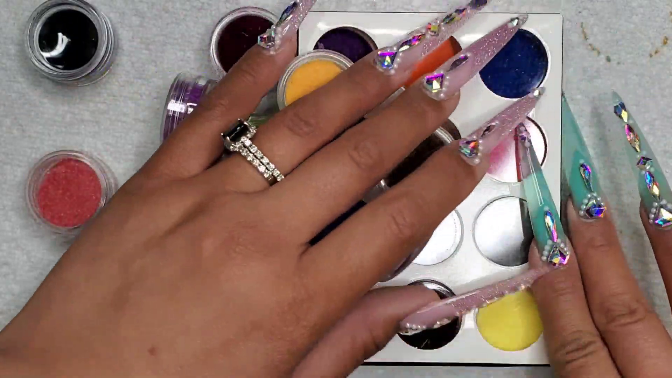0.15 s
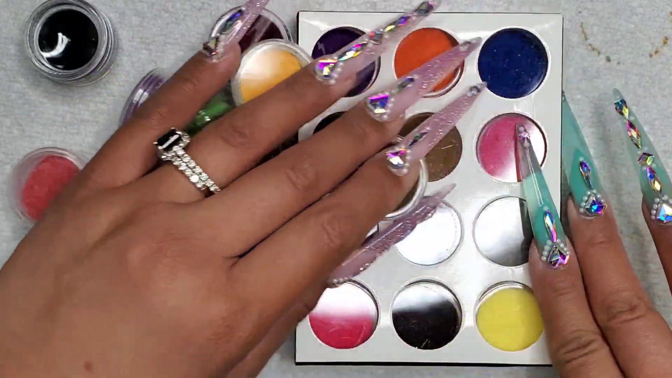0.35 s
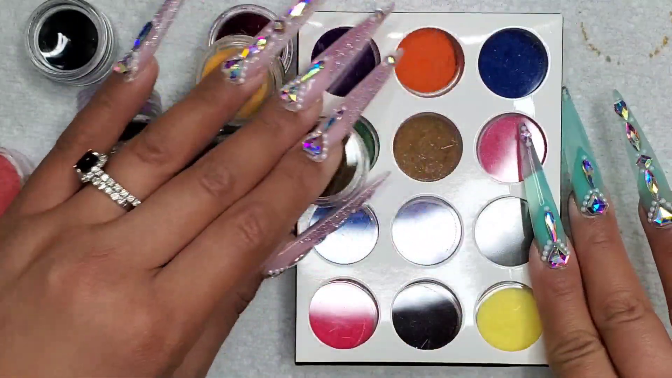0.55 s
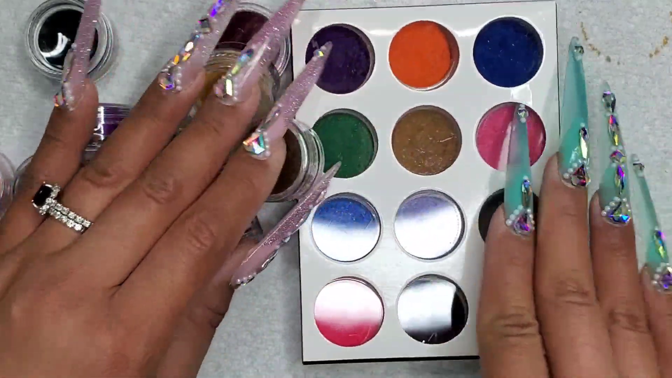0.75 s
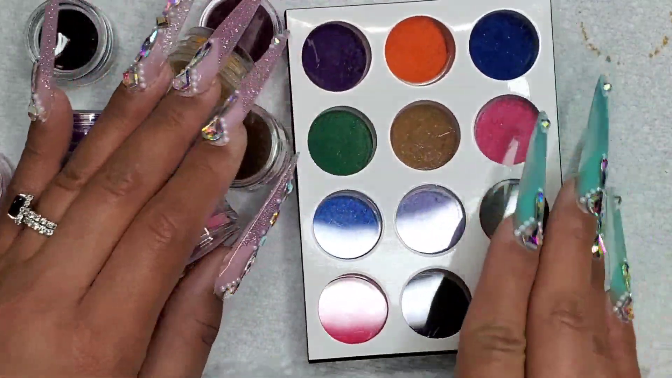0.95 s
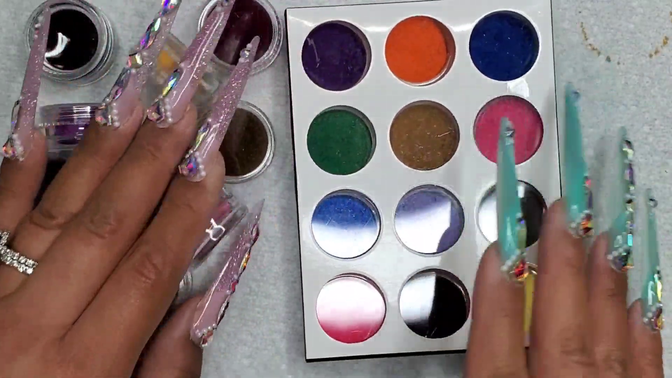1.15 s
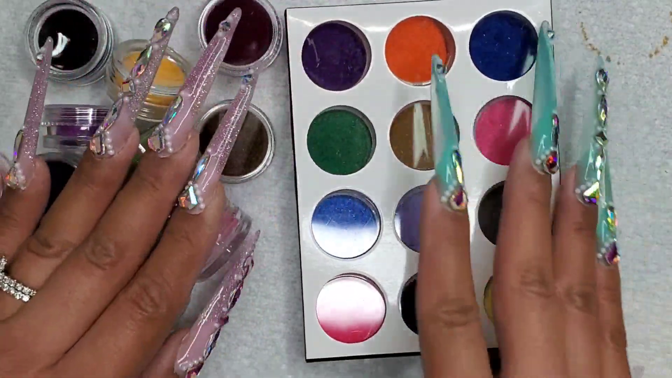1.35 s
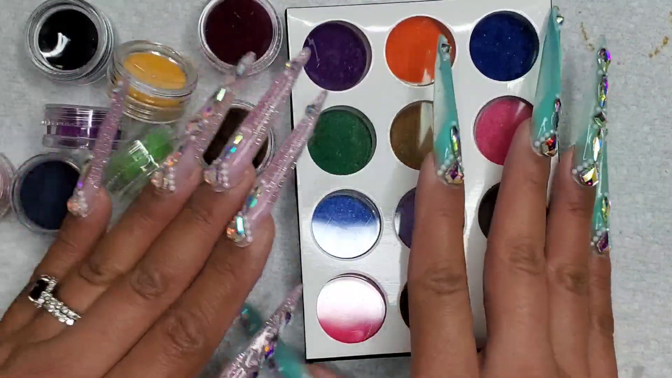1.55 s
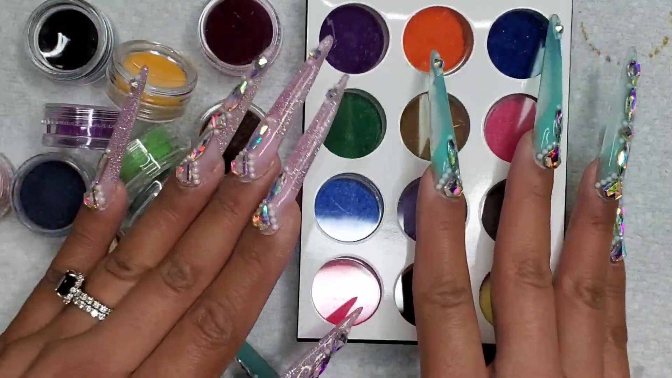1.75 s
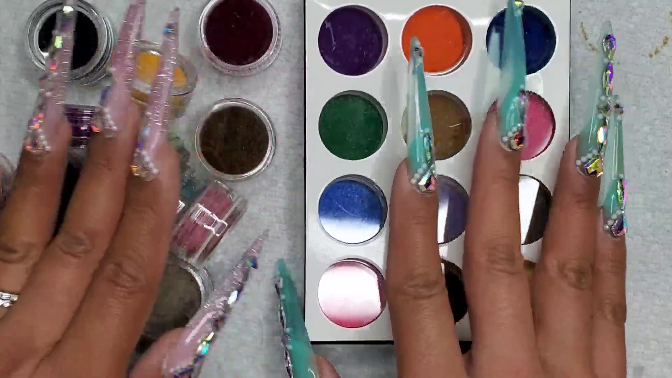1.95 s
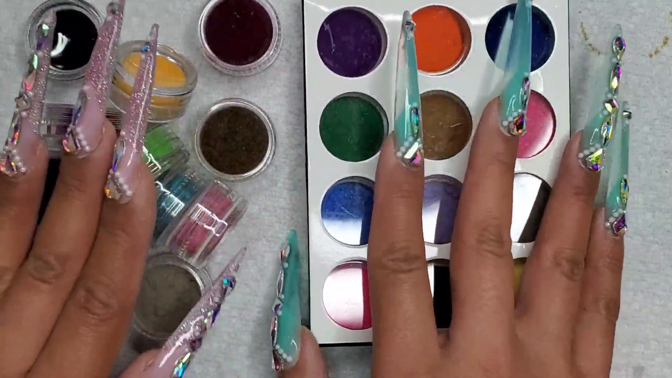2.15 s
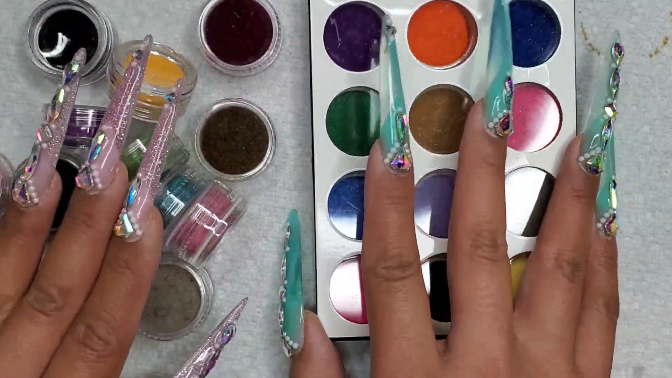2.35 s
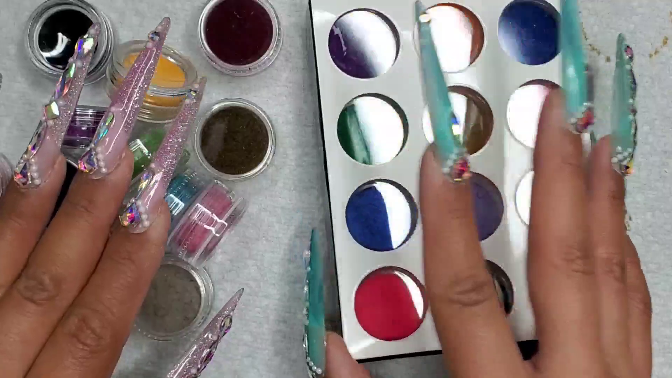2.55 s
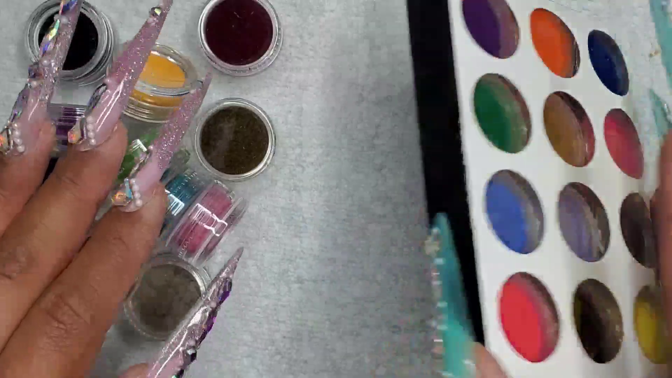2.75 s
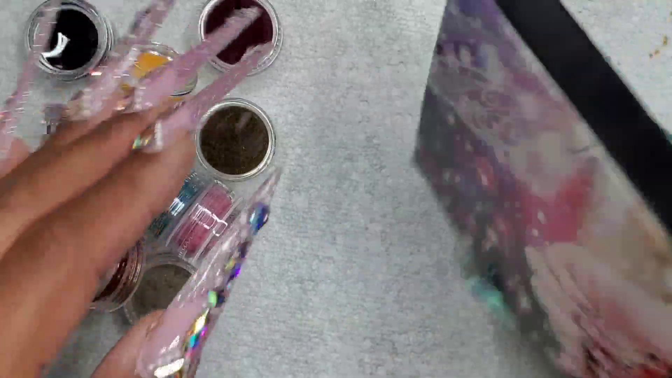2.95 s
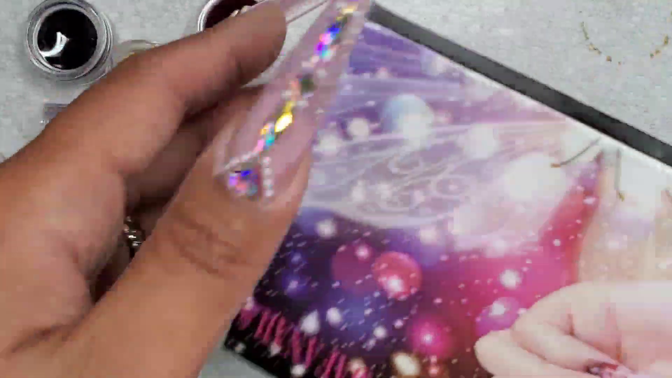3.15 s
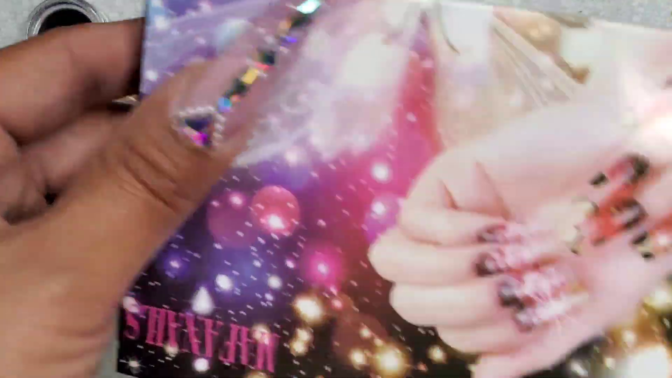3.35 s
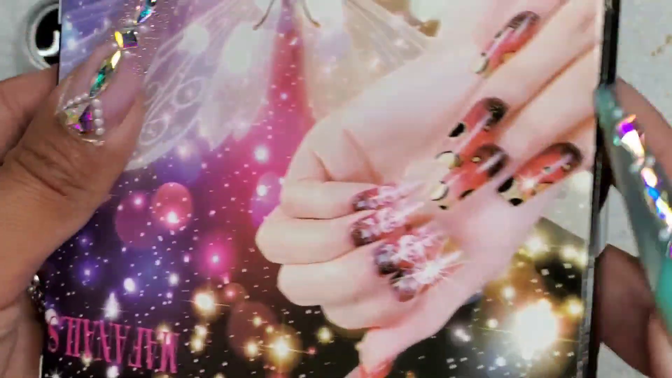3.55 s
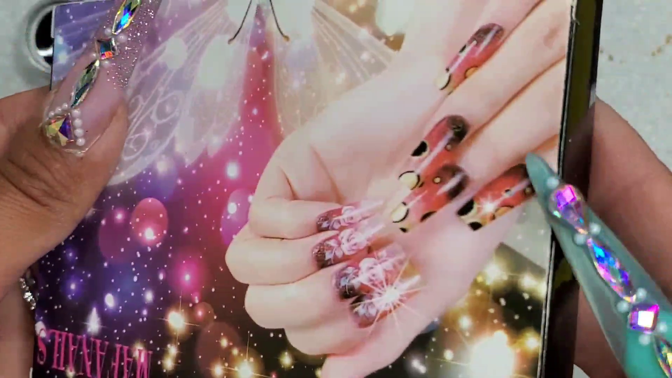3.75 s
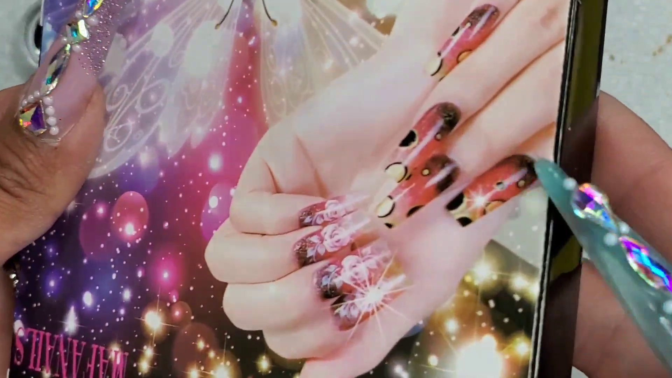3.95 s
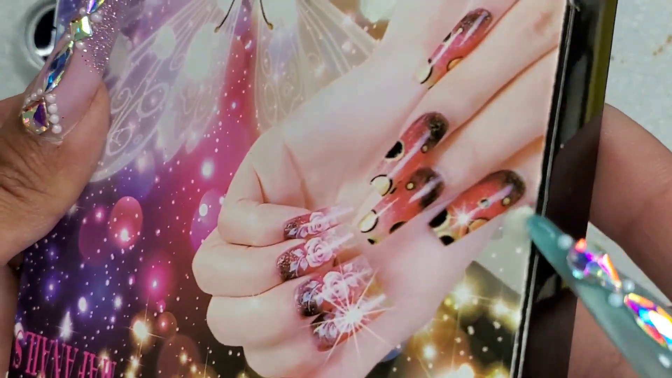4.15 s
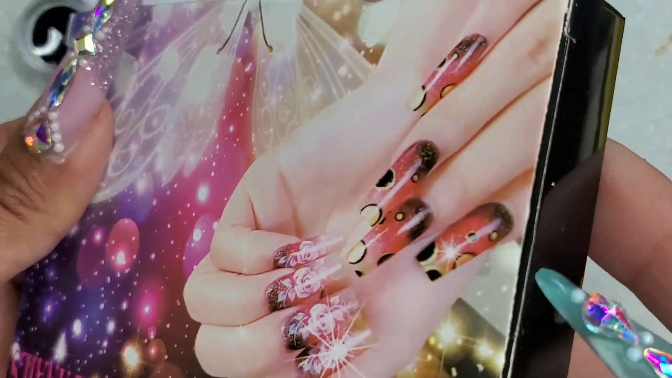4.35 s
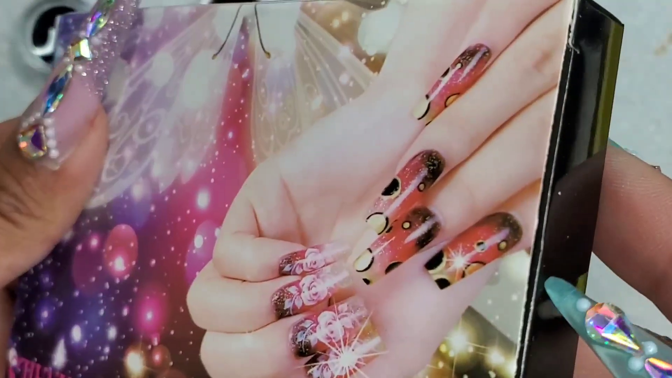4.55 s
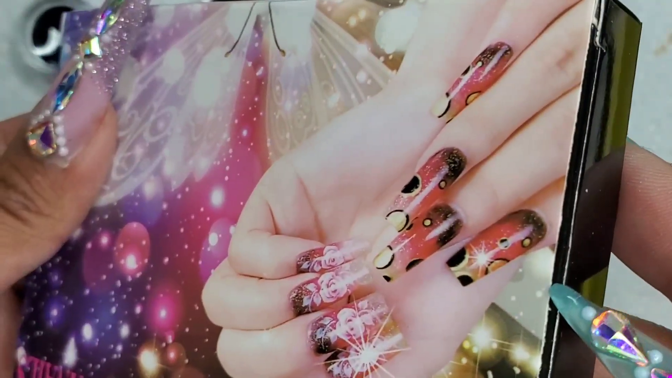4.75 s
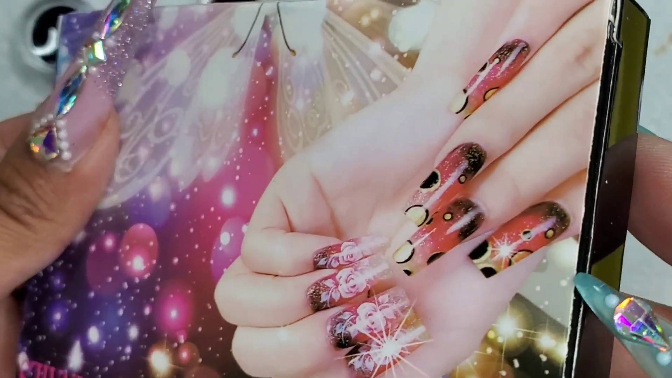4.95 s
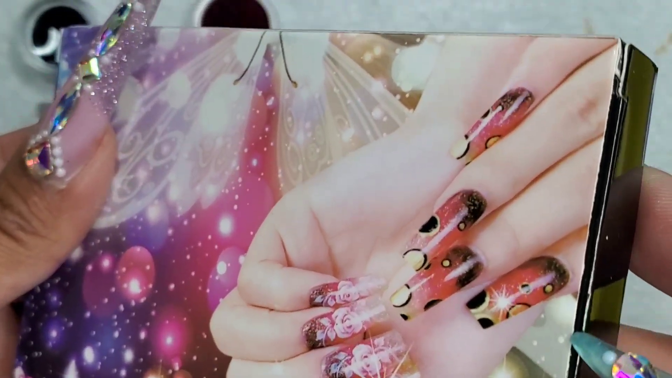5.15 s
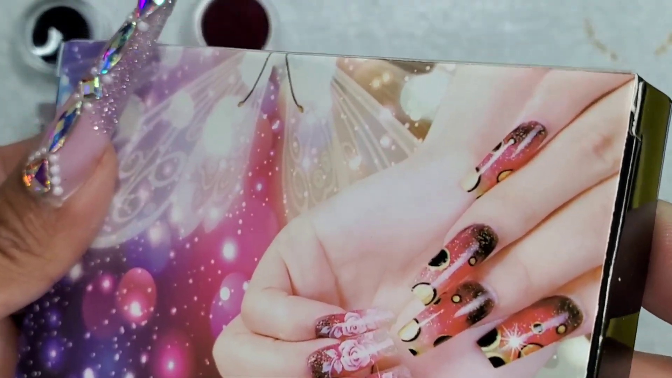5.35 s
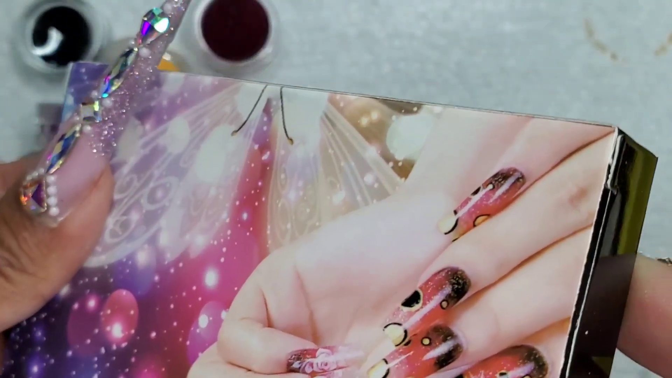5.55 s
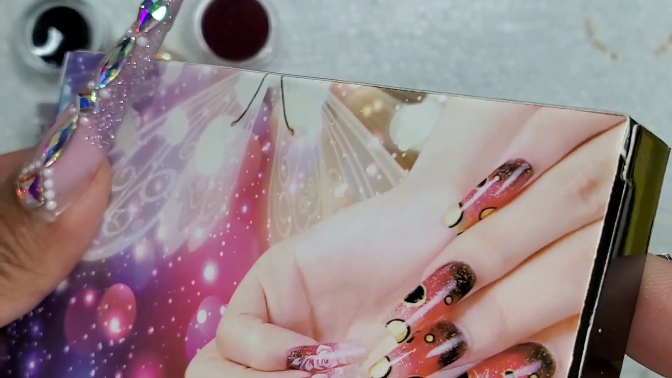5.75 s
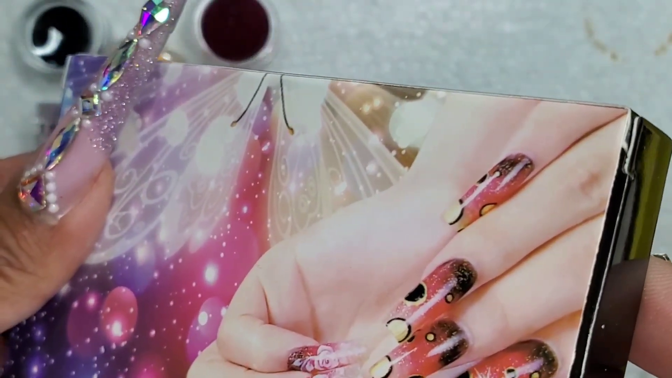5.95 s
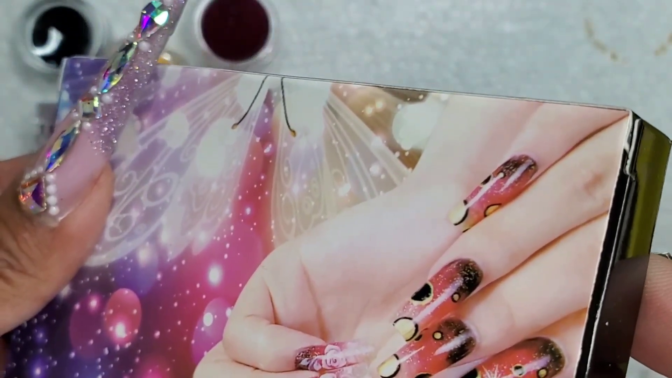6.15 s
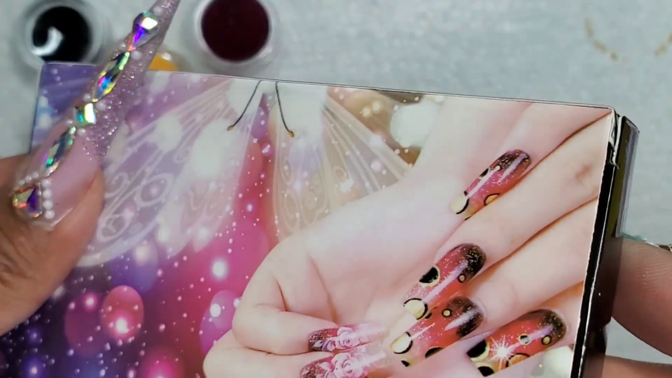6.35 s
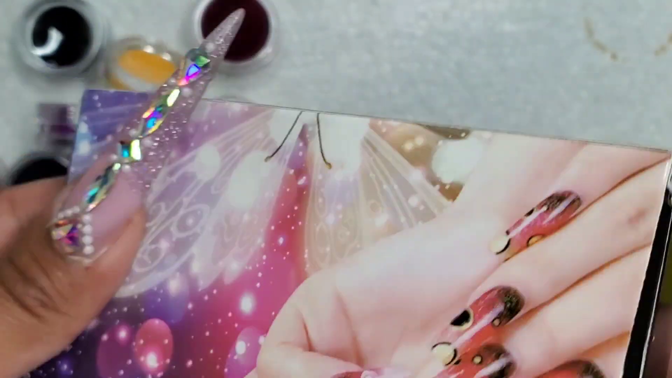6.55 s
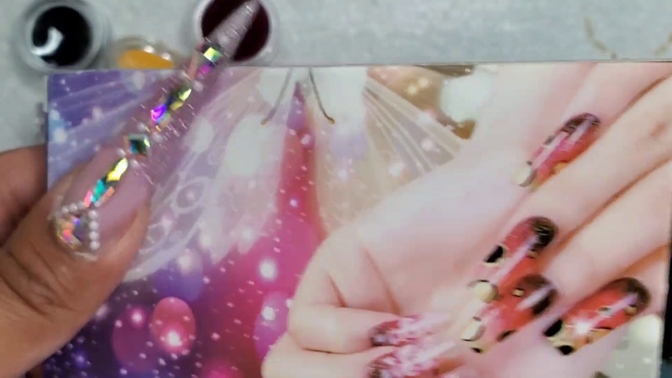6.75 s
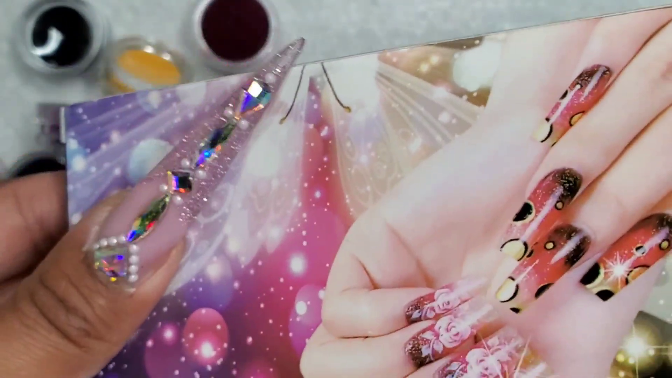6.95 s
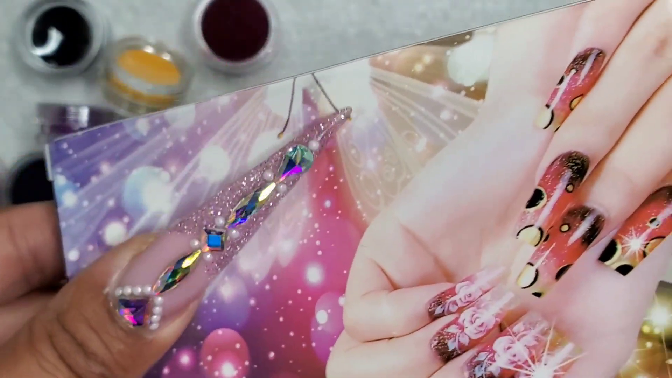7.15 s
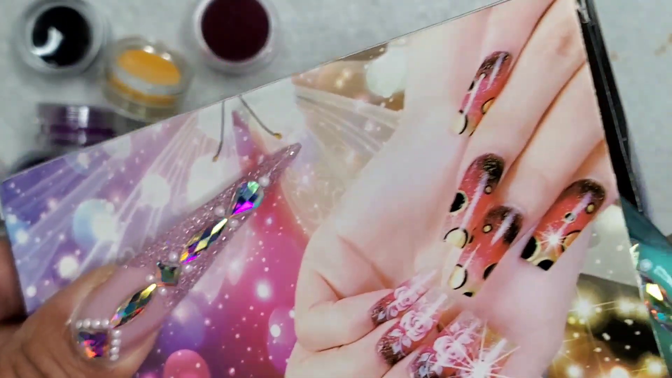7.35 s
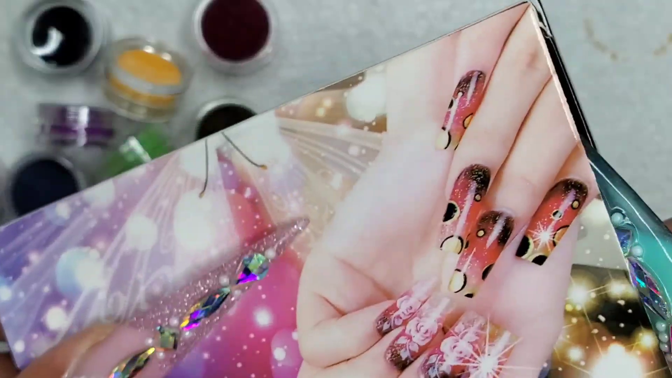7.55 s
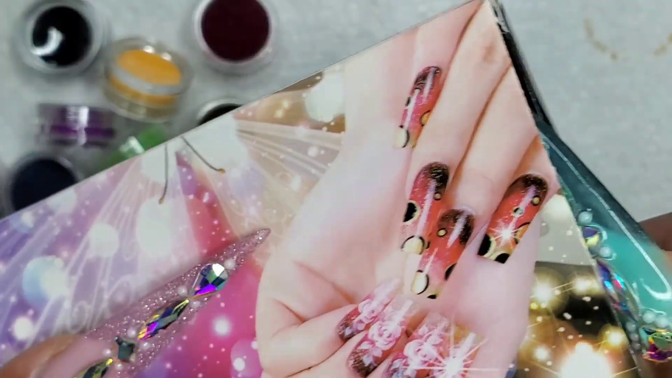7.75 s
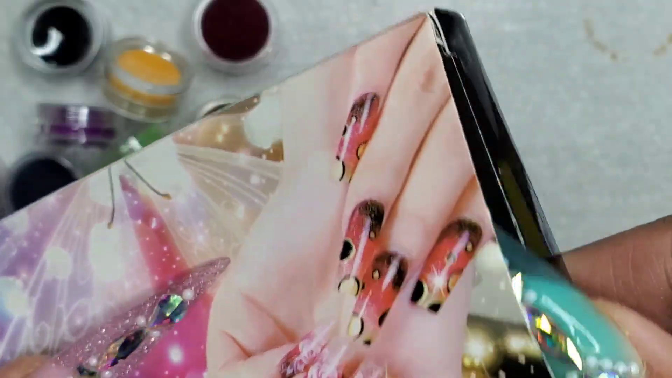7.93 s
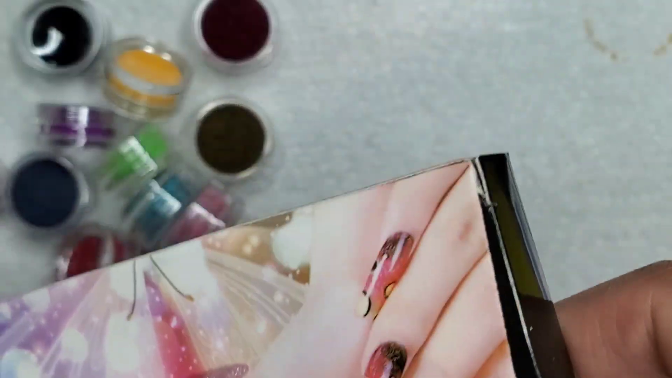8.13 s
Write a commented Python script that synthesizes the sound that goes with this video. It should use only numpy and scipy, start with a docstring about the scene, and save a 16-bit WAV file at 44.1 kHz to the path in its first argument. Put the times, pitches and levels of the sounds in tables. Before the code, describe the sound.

Close, dry stereo sound in a small furnished room with a faint low hum and hiss. From 0 to about 0.7 seconds small hard plastic jars clatter in quick bright clicks, with gritty sliding and tiny squeaks, strongest around 0.25 to 0.5. Stronger knocks with dull table bumps come at 1.07 to 1.17, then only faint clicks until 2. After near quiet, a nail scrapes briefly at 2.6 and 2.8, and a bright jar clatter at 3.0 joins card taps and rubbing. Hollow card taps continue to 3.8; firmer knocks fall at 4.17, 4.67, 5.53 and 6.06, with light picking between. At 6.56 comes by far the loudest knock, a boxy, slightly distorted crack with a flutter of knocks and a short high squeal. Softer rubs follow, a sharper tap at 7.37, then busier nail taps and shuffling from 7.5 to the final double tap near 8.1.

```python
"""Plastic jars and a card palette

Small plastic jars are pushed together on a table and clatter, close to a stereo microphone.
A cardboard palette is then tapped by long fingernails and worked open; its lid gives with a knock and squeal.
Every contact rings a jar or the card, and sliding is a stream of tiny slips that ring them too.
Thumps and squeaks are single swinging tones; behind lie a short room tail and a low hum and hiss of noise."""
import sys
import numpy as np
from scipy import signal
from scipy.fft import rfft, irfft
from scipy.io import wavfile
from scipy.ndimage import uniform_filter1d

SR = 44100
rng = np.random.default_rng(int(sys.argv[2]) if len(sys.argv) > 2 else 0)


def unload_audio(sound):
    """Save the sound as a 16-bit wav file, at the path given as the first command line argument."""
    columns = np.transpose(np.atleast_2d(sound))
    # keep every value between -1 and 1, then stretch to whole-number steps
    steps = np.round(np.clip(columns, -1, 1) * 32767)
    wavfile.write(sys.argv[1], SR, steps.astype(np.int16))


N = 361179  # samples

# Levels in the tables are those before layer gain, room and microphone.
# jars knocking together: (time [s], level at 1-4 kHz [dB], body re level [dB],
# brightness re level [dB], leading resonance [Hz])
JAR_HITS = [(.0283, -29, -15, -6, 1760), (.0478, -27.5, -22, 4.5, 5970), (.069, -30, -13, 1, 4220),
            (.1425, -29, -11, 4, 5530), (.2006, -26.5, -22, -1, 1440), (.2367, -16, -27, 3.5, 5740),
            (.2444, -13.5, -38, 4.5, 5610), (.3126, -18, -28, -4, 1860), (.3502, -10, -23, 6, 6040),
            (.36, -17.5, -10.5, 8, 4030), (.3744, -20.5, -28, 6, 4300), (.402, -21, -18, 8.5, 5700),
            (.4365, -23, -20, 7.5, 4140), (.4615, -20, -22, 5, 4110), (.4994, -22, -30, 2.5, 3200),
            (.5129, -23, -15, -6.5, 3030), (.558, -25.5, -9.5, 8, 5950), (.6096, -28.5, -18, 6, 2800),
            (.6273, -23.5, -27, 0, 4520), (.7366, -47, -16, 3, 5830), (.7646, -24, -28, -1, 2860),
            (.9092, -28.5, -22, 3, 5680), (.9198, -23, -25, -3.5, 4360), (1.0221, -26, -33, -11, 3400),
            (1.0357, -31.5, -26, 4, 2980), (1.0714, -13.5, -16.5, -9, 1920), (1.0849, -21, -8, -2, 1870),
            (1.1147, -13.5, -22, -3.5, 3350), (1.1668, -28, -14, 9.5, 5700), (1.2805, -34, -10, 10, 5620),
            (1.3212, -30, -19, 12.5, 5800), (1.3475, -39.5, -22, 9, 5800), (1.4496, -27.5, -30, 11, 4520),
            (1.6863, -29, -22, 1.5, 1950), (1.716, -51, -9, 19, 10300), (1.7913, -25, -30, 1.5, 5740),
            (1.8446, -32.5, -20, 3.5, 5660), (1.8546, -38.5, -16, 3, 5730), (1.9502, -27.5, -17, -15, 1190),
            (2.9234, -24.5, -11, 4.5, 4800), (3.0087, -17.5, -5.5, 8.5, 5800), (3.0257, -16, -24, -2, 4400),
            (3.0369, -23, -7, 12.5, 5630)]
# pushes that slide the jars on the table: (start [s], length [s], level at 1-4 kHz [dB],
# body re level [dB], treble re level [dB])
JAR_PUSHES = [(0, 0.067, -23, -22, 0), (.07, .62, -39, 1, 4.5), (.17, 0.21, -31, -17, -1),
              (.35, 0.18, -33.5, -6, 4), (.62, 0.05, -35, -19, -13), (.69, 0.22, -36, -12.5, -0.5),
              (.87, 0.072, -35.5, -8.5, -6), (1.012, 0.08, -22.5, -21, -10), (1.11, 0.097, -42, 0.5, 1),
              (1.2, 0.2, -45.5, -5.5, -8), (1.595, 0.044, -36, -14, -3.5), (1.665, 0.02, -33, -25, -1),
              (1.72, 0.13, -47.5, -19, -3), (1.99, .05, -42, -29, 3.5)]
# modes of a jar before detuning and scatter: (frequency [Hz], relative level [dB], t60 [s])
JAR_MODES = [(676, -2, 0.089), (1256, -2.5, 0.042), (1320, -0.5, 0.067), (1773, 0, 0.085), (2950, 7, 0.024),
             (3180, -3, 0.011), (3680, -19.5, 0.0058), (4170, -7, 0.1), (5000, -10, 0.062),
             (5404, -1.5, 0.025), (5926, 2.5, 0.043), (9320, -7.5, 0.022), (10050, -37.5, 0.018),
             (10200, 12.5, 0.026), (13200, -24, 0.0175)]
# colour of a jar's dense, quickly damped ringing: (frequency [Hz], relative level [dB])
JAR_COLOUR = [(150, -13), (400, -4.5), (640, 5.5), (880, -32), (1300, -2.5), (3000, 4), (5900, -13.5),
              (7000, -6), (8500, -13), (10700, -8), (13500, -3), (16000, -18)]
# nails and edges striking the card palette: (time [s], level at 1-4 kHz [dB], body re level [dB],
# brightness re level [dB], leading resonance [Hz])
CARD_HITS = [(2.6207, -35.5, -27, 8, 730), (2.64, -26, -37, -3, 1880), (2.7798, -25, -5, 7.5, 797),
             (2.9572, -23.5, 0, -2.5, 464), (3.1073, -25.5, -2, -1, 676), (3.3315, -16, -3.5, -29, 585),
             (3.3591, -21.5, -20, -8.5, 560), (3.3809, -38, 10, 1, 520), (3.4223, -31, -1.5, -12, 727),
             (3.4909, -28.5, -10, -9.5, 550), (3.5426, -33.5, -8.5, -23, 434), (3.6077, -25, -18, -7, 530),
             (3.6211, -22.5, -5, -10, 1025), (3.7873, -30, -23, -16.5, 1650), (4.1717, -15, -2.5, -7, 1460),
             (4.2735, -34.5, -5.5, -20, 1220), (4.3946, -25, -0.5, -9, 600), (4.67, -18, -9, -13, 1220),
             (4.704, -49, 13.5, -22, 460), (4.82, -52, -21, 2, 5200), (4.8957, -41, -18, -7.5, 950),
             (5.0367, -36.5, -24, -1, 5500), (5.265, -36.5, 1, -27, 1290), (5.4798, -33, -18, -7, 470),
             (5.5271, -15.5, -2.5, -6, 734), (5.5602, -24.5, -3, -2.5, 537), (5.648, -45, 2, -11, 450),
             (5.7098, -38, 4, -12.5, 410), (5.7998, -37, -11, -20, 510), (5.896, -40.5, 0.5, -17, 450),
             (5.9455, -39.5, -3.5, -19, 487), (6.0644, -19, -5, -14, 490), (6.3168, -37, -14, -13, 2180),
             (6.5613, 1, -12.5, -8, 650), (6.5717, -17.5, 1.5, -15, 540), (6.5924, -13.5, 4, -2, 551),
             (6.61, -10.5, 2.5, -3, 594), (6.6265, -18.5, 4.5, -2, 535), (6.6465, -22.5, -2, 2, 505),
             (6.7982, -28.5, 0, -4, 890), (6.8447, -37, 7, -11, 625), (7.0248, -28.5, -8.5, -6.5, 665),
             (7.0717, -35, -2, -9, 680), (7.149, -52, -16, 11.5, 8000), (7.349, -34.5, -10, -8, 620),
             (7.3726, -18, -12.5, -12, 2300), (7.4941, -30, -2, -2.5, 427), (7.5391, -30, -2, -8, 624),
             (7.585, -42.5, 7.5, -11, 540), (7.6862, -19, -1, -5.5, 596), (7.7933, -19, -10.5, 1, 553),
             (7.8249, -31.5, 9, -6, 634), (7.8549, -23.5, -0.5, -23, 780), (7.874, -45.5, 7, 21, 12700),
             (7.9702, -25.5, -4, -5.5, 665), (8.0829, -17, -5, -6, 662), (8.0962, -23, -1.5, -3.5, 657)]
# strokes of card on card and fingers: (start [s], length [s], level at 1-4 kHz [dB],
# body re level [dB], treble re level [dB])
CARD_STROKES = [(2.335, .03, -41, -35, 3.5), (2.52, 0.048, -39.5, -18, 2.5),
                (2.605, 0.095, -39.5, -32, 10.5), (2.768, 0.018, -19, -26, 1), (2.8, 0.25, -37.5, -8.5, -1),
                (2.961, 0.01, -25.5, -3.5, -2.5), (3.02, 0.11, -29.5, -5.5, -6),
                (3.15, 0.24, -50.5, -5, 2.5), (3.3, 0.039, -21, -9, -13), (3.37, 0.05, -31.5, -12, 2),
                (3.44, 0.2, -43, -12, -2), (3.6, 0.077, -31.5, -7, -17.5), (3.79, 0.051, -42, -4.5, -15),
                (4.01, 0.14, -46, 2, -5.5), (4.33, 0.051, -42, -8, -11), (5.24, 0.019, -41, -16, -10),
                (5.47, 0.11, -42, -5.5, -13), (5.71, 0.029, -45.5, 2.5, -14), (6.552, 0.1, -26, -5, -18),
                (6.755, .15, -30.5, -3, -4), (6.795, 0.036, -21.5, -7.5, -11), (6.93, .42, -45.5, -9, -6.5),
                (7.03, 0.1, -39.5, -4.5, -6), (7.45, 0.11, -39, -0.5, -2), (7.68, 0.026, -26.5, -4.5, -5.5),
                (7.75, 0.018, -39, -8, -23), (7.805, 0.068, -26.5, -3, -2), (7.89, 0.16, -32, -7, -3),
                (8.085, 0.012, -18.5, -1, -5)]
# modes of the free palette, before detuning and scatter: (frequency [Hz], relative level [dB], t60 [s])
CARD_MODES = [(440, -2, 0.079), (542, -1, 0.14), (648, -17.5, 0.11), (736, -10.5, 0.027),
              (1274, -2.5, 0.018), (1363, -6, 0.42), (1430, 7.5, 0.05), (1800, 4, 0.055),
              (1974, -4.5, 0.12), (2080, -32, 0.057), (3130, -1, 0.059), (3570, -3, 0.099),
              (4280, -37, 0.033), (6200, -42, .04)]
# colour of the card's dense ringing: (frequency [Hz], relative level [dB])
CARD_COLOUR = [(150, -16), (300, -30.5), (500, -14), (780, -6), (1020, 3), (1420, 14), (1900, 6),
               (2400, 14.5), (4200, -5), (5800, 0), (8300, -12), (11000, -2), (16000, -18)]
# a long nail dragged over the palette, before judder: (time [s], level [dB])
NAIL_DRAG = [(2.58, -42.5), (2.63, -20), (2.68, -33.5), (2.72, -45.5), (2.775, -21.5), (2.82, -39)]
# dull bumps of the table and the palette: (start [s], pitch [Hz], level [dB], t60 [s])
THUMPS = [(1.111, 220, -29, 0.16), (1.113, 638, -17.5, 0.076), (1.169, 510, -20, 0.051),
          (1.167, 198, -27, 0.16), (1.169, 342, -18, 0.079), (2.862, 276, -44, 0.086),
          (3.01, 289, -28.5, 0.2), (4.051, 30.8, -24.5, 0.48), (4.087, 30.2, -26, 0.22),
          (4.17, 109, -17.5, 0.068), (4.172, 744, -10.5, 0.041), (5.529, 78, -21, 0.2),
          (6.56, 117, -4, 0.12), (6.593, 154, -9.5, 0.081), (6.596, 348, -12, 0.068),
          (7.372, 755, -13, 0.043), (7.697, 77, -20.5, 0.11), (8.082, 290, -19, 0.037)]
# squeaks and groans that lock on one resonance: (middle of swell [s], mean pitch [Hz], peak [dB], length [s])
SQUEAKS = [(.315, 1730, -11.5, .014), (0.375, 4120, -8.5, 0.018), (0.891, 128, -29, 0.038),
           (0.91, 384, -33, 0.065), (.975, 357, -37.5, 0.056), (3.231, 497, -40.5, 0.036),
           (6.602, 528, -9, 0.045), (6.617, 4450, -5, 0.018), (6.638, 5560, -15, 0.021),
           (6.757, 515, -27.5, 0.0197), (7.077, 661, -28.5, 0.031)]
# colour of the room tone: (frequency [Hz], relative level per Hz [dB])
ROOM_TONE = [(12, -30), (20, -10.5), (63, 0.5), (98, -12), (187, -28), (255, -22.5), (472, -36),
             (678, -27.5), (897, -41), (1220, -31), (4670, -33.5), (5530, -37), (8180, -44.5), (11800, -33),
             (16000, -27)]
# likeness of the two channels: (frequency [Hz], likeness [0-1])
LIKENESS = [(100, 0.89), (600, 0.72), (1500, 0.08), (4000, 0), (12000, 0)]
# treble difference of the two capsules: (frequency [Hz], left minus right [dB])
CAPSULES = [(2000, 0), (4500, -3), (8000, -3), (12000, 3)]
# body, middle, treble and top: (lower edge [Hz], upper edge [Hz])
BANDS = [(250, 1000), (1000, 4000), (4000, 8000), (8000, 17000)]

RING_S, ATTACK_S = .16, .012  # length of a ring, and the part of it that sets its level
HAND_T60 = .085  # s, extra damping by the hands on the palette
STROKE_RISE_S, STROKE_T60 = 0.033, 0.094  # a stroke grips quickly and dies away as the hand slows
RISE_DEPTH_DB = 33.5  # gained during that rise
LATE_T60, LATE_DB = .3, -19  # the room's longer tail
ROOM_TONE_DB = -41.5  # rms at the microphone
TOP_HZ = 16100  # upper limit of the microphone channel


def jar_ring(lead_hz, lead_db=8, lead_t60=0.026):
    """Hard plastic rings in bright, short modes; every jar is tuned a little differently."""
    lead = (lead_hz, lead_db, lead_t60)
    return ring(JAR_MODES, lead, JAR_COLOUR, dense_t60=0.051, modes_db=3.5, crack_db=-5.0,
                detune=.065, scatter_db=4)


def card_ring(lead_hz, lead_db=9, lead_t60=0.059):
    """Stiff hollow card rings; the hands that hold it cut the ringing short."""
    lead = (lead_hz, lead_db, lead_t60)
    free = ring(CARD_MODES, lead, CARD_COLOUR, dense_t60=0.029, modes_db=3.0, crack_db=-1,
                detune=0.035, scatter_db=3)
    return free * fade(np.arange(free.shape[1]) / SR, HAND_T60)


def ring(modes, lead, colour, dense_t60, modes_db, crack_db, detune, scatter_db):
    """One blow: a crack, dense short ringing and modes of chance weight; one mode leads."""
    size = int(RING_S * SR)
    t = np.arange(size) / SR
    hz, db, t60 = np.transpose([lead, *modes])[:, :, None]
    pitch, weight, side = rng.standard_normal((3, len(hz), 1))
    pitch[0] = weight[0] = 0  # the leading mode is exact
    # high modes reach the two capsules out of step
    skew = side * np.arccos(np.clip(on_log_axis(hz, LIKENESS), 0, 1)) / 2
    phase = 2 * np.pi * hz * (1 + detune * pitch) * t
    swing = undb(db + scatter_db * weight) * fade(t, t60) * rng.choice([-1, 1], hz.shape)
    tones = np.array([(swing * np.cos(phase + sign * skew)).sum(0) for sign in (1, -1)])
    dense = unit(noise(size, colour) * fade(t, dense_t60))
    return dense + undb(modes_db) * unit(tones) + undb(crack_db) * crack(size, colour)


def crack(size, colour):
    """The first wavefront of a contact: a causal click with the body's colour."""
    hz = np.arange(size // 2 + 1) * SR / size
    # folding the cepstrum puts the energy at the start (minimum phase)
    cepstrum = irfft(np.log(undb(on_log_axis(hz, colour))), size)
    cepstrum[1:size // 2] *= 2
    cepstrum[size // 2 + 1:] = 0
    return unit(irfft(np.exp(rfft(cepstrum)), size))


def blows(table, body, gain_db, pan_db, top_db, top_slope):
    """Each contact rings the body, balanced band by band; the top octave follows the treble."""
    out = np.zeros((2, N))
    for s, db, body_db, bright_db, lead_hz in table:
        sound, blow = body(lead_hz), 0
        tones_db = (body_db, 0, bright_db, top_db + top_slope * bright_db)
        for edges, tone_db in zip(BANDS, tones_db):
            part = band(sound, edges)
            attack_rms = np.sqrt(np.mean(part[:, :int(ATTACK_S * SR)] ** 2))
            blow = blow + undb(tone_db) * part / attack_rms
        add(out, s, blow * undb(db))
    return out * undb(gain_db) * pan(pan_db)


def ticks(start_s, end_s, db, body_db, bright_db, lead_hz, spread_db, pitch_spread, count):
    """Rows of light contacts at chance moments, each with its own strength, colour and resonance."""
    when = rng.uniform(start_s, end_s, count)
    size, body, bright, pitch = rng.standard_normal((count, 4)).T
    leads_hz = lead_hz * np.exp(pitch_spread * np.tanh(pitch))
    return np.transpose([when, db + spread_db * size, body_db + 4 * body, bright_db + 4 * bright, leads_hz])


def grazes(table, weaker_db, early_s):
    """Rows of the light touches with which a long nail meets the card just before each tap."""
    return [(s - early_s * rng.uniform(.5, 1.5), db + weaker_db, *colour) for s, db, *colour in table]


def friction(strokes, body, lead_hz, slips_per_s, spread_db, grip_db, grip_per_s, gain_db, pan_db, count=5):
    """Tiny slips ring the body at several points of contact, each gripping and letting go on its own."""
    sound = 0
    for _ in range(count):
        sizes = undb(spread_db * np.minimum(rng.exponential(size=N), 4)) * rng.choice([-1, 1], N)
        happens = rng.random(N) < slips_per_s / SR
        slips = sizes * happens * undb(grip_db * np.tanh(walk(grip_per_s)))
        point_hz = lead_hz * np.exp(0.585 * np.tanh(rng.standard_normal()))
        sound = sound + convolve(slips, body(point_hz))
    ranges = BANDS[0], BANDS[1], (BANDS[2][0], BANDS[3][1])
    out = 0
    for edges, push in zip(ranges, effort(strokes)):
        part = band(sound, edges)
        # over a tenth of a second the hand's push, not chance, sets the loudness
        power = uniform_filter1d(np.mean(part ** 2, axis=0), size=SR // 10)
        out = out + part / np.sqrt(power + 1e-12) * push
    return out * undb(gain_db) * pan(pan_db)


def effort(strokes):
    """Strength of body, middle and treble over time: every stroke rises, holds and dies away."""
    t = np.arange(0, N, 32) / SR
    power = 0
    for start_s, length_s, db, body_db, treble_db in strokes:
        rise = undb(-RISE_DEPTH_DB * np.maximum(start_s - t, 0) / STROKE_RISE_S)
        release = fade(np.maximum(t - start_s - length_s, 0), STROKE_T60)
        levels = undb([db + body_db, db, db + treble_db])
        power = power + np.outer(levels, rise * release) ** 2
    return [np.interp(np.arange(N) / SR, t, np.sqrt(p)) for p in power]


def nail_drag(hz=1900, width=0.17, judder_db=5):
    """Fine stick-slip excites the nail's own broad resonance: band noise with a juddering level."""
    level_db = np.interp(np.arange(N) / SR, *np.transpose(NAIL_DRAG), left=-120, right=-120)
    scrape = unit(band(rng.standard_normal((2, N)), hz * np.exp([-width, width])))
    return scrape * undb(level_db + judder_db * walk(120))


def thumps(rise_cycles=0.073, rough=0.46):
    """A soft push swings the table or the whole palette for a few uneven cycles."""
    out, t = np.zeros((2, N)), np.arange(SR // 2) / SR
    for s, hz, db, t60 in THUMPS:
        shudder = noise(len(t), [(hz / 4, -20), (hz, 0), (2 * hz, -8), (8 * hz, -55)])
        swing = np.sin(2 * np.pi * hz * t) + rough * shudder
        onset = 1 - np.exp(-(t * hz / rise_cycles) ** 2)
        add(out, s, undb(db) * swing * fade(t, t60) * onset)
    return out


def squeaks(waver=0.0039, glide=0.066):
    """Stick-slip friction locks on to one resonance, which swells, rises slightly and lets go."""
    out = np.zeros((2, N))
    for s, hz, db, length in SQUEAKS:
        size = int(length * SR)
        wobble = unit(uniform_filter1d(rng.standard_normal(SR // 4), size=90))[:size]
        pitch = hz * (1 + waver * wobble + glide * np.linspace(-.5, .5, size))
        phase = 2 * np.pi * np.cumsum(pitch) / SR
        skew = np.arccos(np.clip(on_log_axis(hz, LIKENESS), 0, 1)) / 2
        swell = undb(db) * signal.windows.hann(size)
        add(out, s - length / 2, swell * np.sin([phase - skew, phase + skew]))
    return out


def room(x, t60=0.068, wet_db=-14, build_s=0.0036):
    """The table and nearby things answer at once; the furnished room adds a faint, longer tail."""
    t = np.arange(SR // 2) / SR
    colour = [(80, -3), (500, 2.0), (1500, 1), (5500, 7.0), (10000, 8.5), (16000, -9)]  # Hz, dB
    diffuse = noise(len(t), colour) * (1 - np.exp(-t / build_s))
    early = undb(wet_db) * unit(diffuse * fade(t, t60))
    late = undb(LATE_DB) * unit(diffuse * fade(t, LATE_T60))
    return x + convolve(x, (early + late) / np.sqrt(len(t)))


def room_tone():
    """The small room's steady low hum and hiss, as coloured noise."""
    return undb(ROOM_TONE_DB) * noise(N, ROOM_TONE)


def noise(size, colour):
    """Coloured stereo noise of rms 1, alike left and right in the bass."""
    hz = np.arange(size // 2 + 1) * SR / size
    alike = np.clip(on_log_axis(hz, LIKENESS), 0, .995)
    spectra = rfft(rng.standard_normal((2, size))) * undb(on_log_axis(hz, colour))
    mid, side = spectra * np.sqrt([1 + alike, 1 - alike])
    return unit(irfft(np.array([mid + side, mid - side]), size))


def walk(per_s):
    """A smooth random drift with a spread near 1."""
    steps = rng.standard_normal(2000)
    return np.interp(np.arange(N) * per_s / SR, np.arange(len(steps)), steps)


def from_left(x, count):
    """The sound reaches the right capsule a few samples late."""
    return np.array([x[0], np.pad(x[1], (count, 0))[:N]])


def pan(db):
    """Gains of the left and right channel, from left minus right in dB."""
    return undb(np.array([[db], [-db]]) / 2)


def undb(db):
    """Decibels to gain."""
    return 10 ** (np.asarray(db) / 20)


def unit(x):
    """Scale to rms 1."""
    return x / np.sqrt(np.mean(x ** 2))


def fade(t, t60):
    """Exponential decay, 60 dB down after t60."""
    return np.exp(-np.log(1000) * t / t60)


def on_log_axis(hz, points):
    """Read (Hz, value) points at the given frequencies."""
    f, value = np.transpose(points)
    return np.interp(np.log(hz + 1), np.log(f), value)


def band(x, edges):
    """Band-pass between two frequencies."""
    return signal.sosfilt(signal.butter(3, edges, "band", fs=SR, output="sos"), x)


def add(out, s, x):
    """Mix a short stereo sound in at time s."""
    i = max(0, int(s * SR))
    out[:, i:i + x.shape[1]] += x[:, :N - i]


def convolve(x, response):
    """Ring a response with a signal."""
    return signal.fftconvolve(np.atleast_2d(x), response, axes=1)[:, :N]


def scene():
    """The jars close in front, the palette nearer the left capsule, and the room."""
    rattle = ticks(0, .72, db=-35, body_db=-10.5, bright_db=-3, lead_hz=2820,
                   spread_db=1.0, pitch_spread=0.68, count=18)
    jars = blows([*JAR_HITS, *rattle], jar_ring, gain_db=-2.5, pan_db=-1.5, top_db=-5.0, top_slope=1.34)
    jars += friction(JAR_PUSHES, jar_ring, lead_hz=1748, slips_per_s=110, spread_db=2,
                     grip_db=7, grip_per_s=25, gain_db=-1.5, pan_db=-1.5)

    picking = ticks(3.7, 4.5, db=-46, body_db=-4, bright_db=-16, lead_hz=900,
                    spread_db=2.5, pitch_spread=.6, count=8)
    crackle = ticks(8.1, 8.12, db=-43, body_db=0, bright_db=-15, lead_hz=1300,
                    spread_db=4.0, pitch_spread=0.48, count=12)
    nail_touches = grazes(CARD_HITS, weaker_db=-12.5, early_s=.0045)
    taps = [*CARD_HITS, *nail_touches, *picking, *crackle]
    card = blows(taps, card_ring, gain_db=0, pan_db=1.0, top_db=-3.5, top_slope=1.51)
    card += friction(CARD_STROKES, card_ring, lead_hz=1015, slips_per_s=350, spread_db=2.5,
                     grip_db=12.5, grip_per_s=35, gain_db=0, pan_db=-0.5)

    near = from_left(jars, count=2) + from_left(card, count=10) + nail_drag() + thumps() + squeaks()
    return room(near) + room_tone()


def record(dry):
    """Each capsule has its own colour; the loudest knocks overload the input; the top is cut."""
    balance_db = on_log_axis(np.arange(N // 2 + 1) * SR / N, CAPSULES)
    heard = irfft(rfft(dry) * undb(np.array([balance_db, -balance_db]) / 2), N)
    top_cut = signal.ellip(8, .1, 50, TOP_HZ, fs=SR, output="sos")
    return signal.sosfiltfilt(top_cut, np.clip(heard, -1, 1))


dry = scene()
out = record(dry)
unload_audio(out)
```